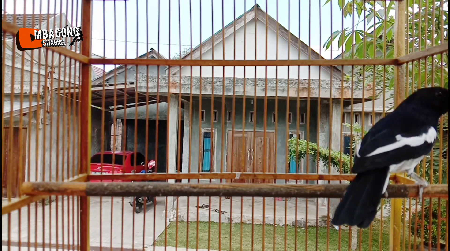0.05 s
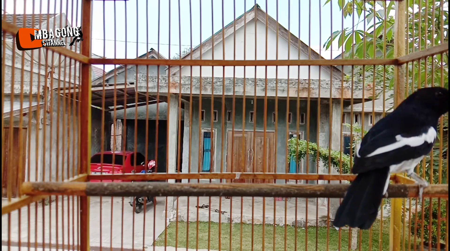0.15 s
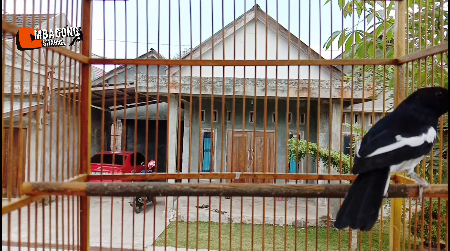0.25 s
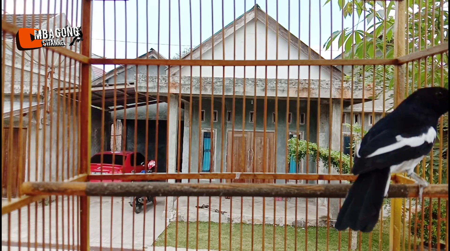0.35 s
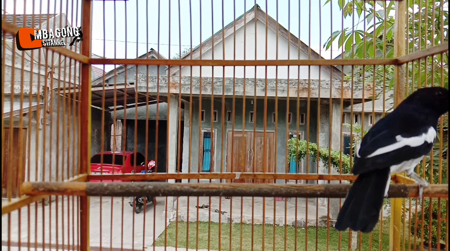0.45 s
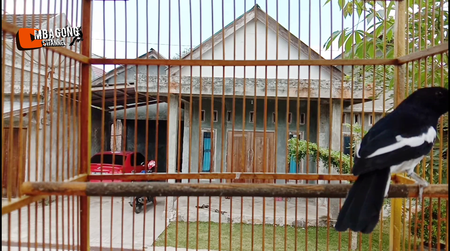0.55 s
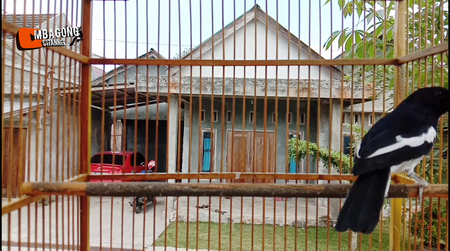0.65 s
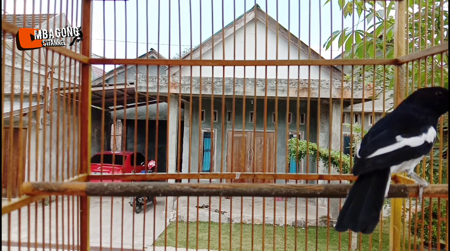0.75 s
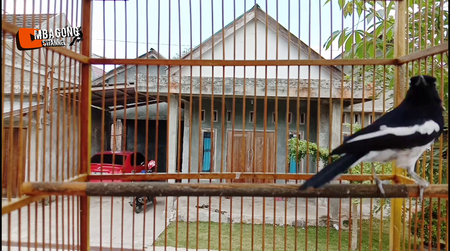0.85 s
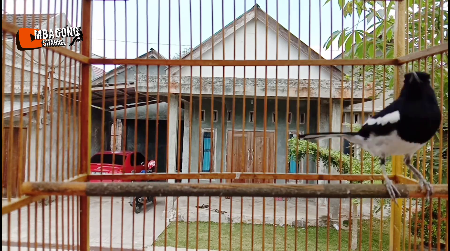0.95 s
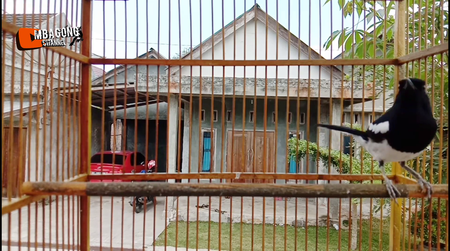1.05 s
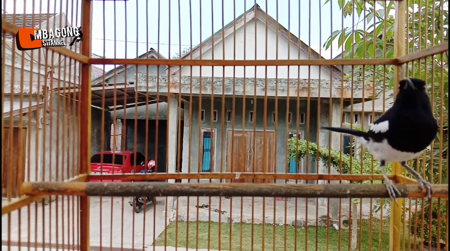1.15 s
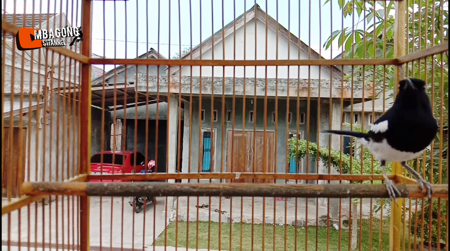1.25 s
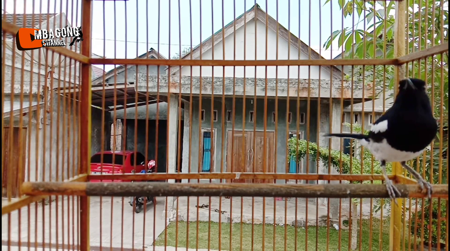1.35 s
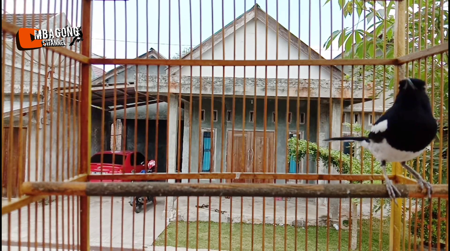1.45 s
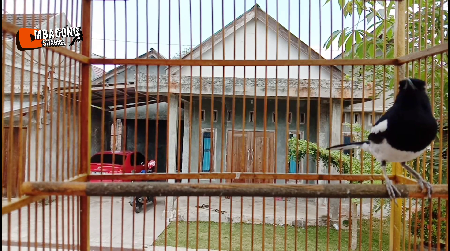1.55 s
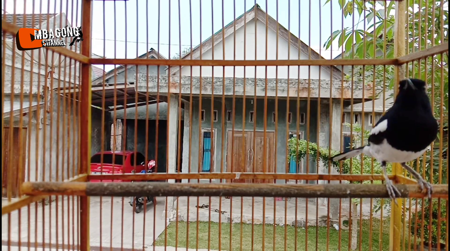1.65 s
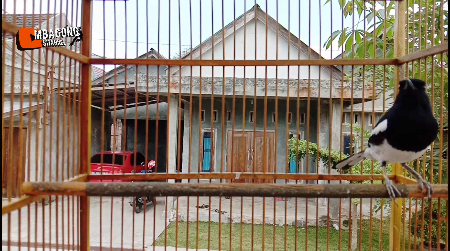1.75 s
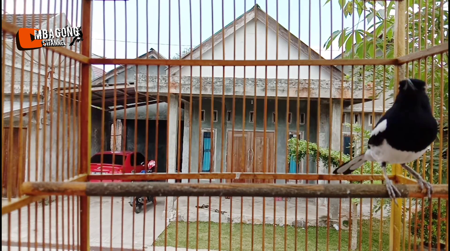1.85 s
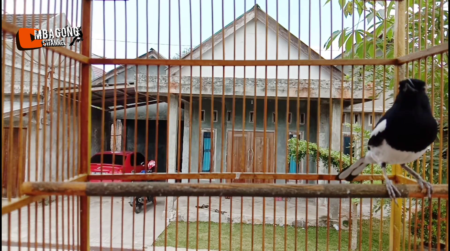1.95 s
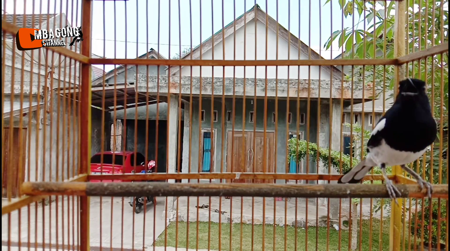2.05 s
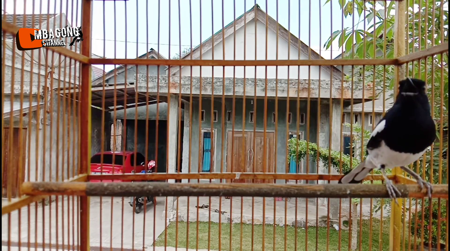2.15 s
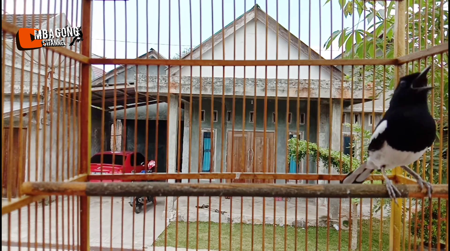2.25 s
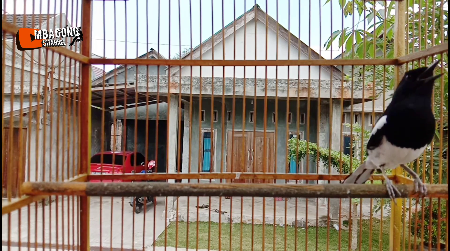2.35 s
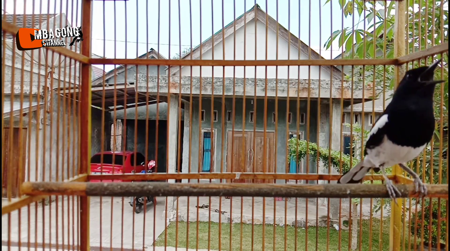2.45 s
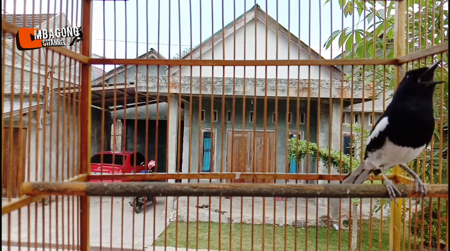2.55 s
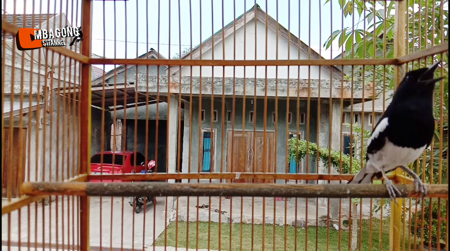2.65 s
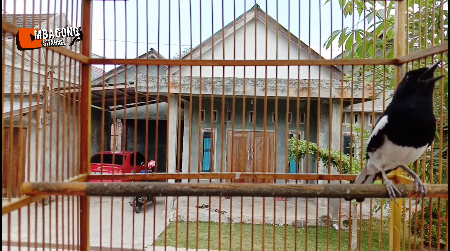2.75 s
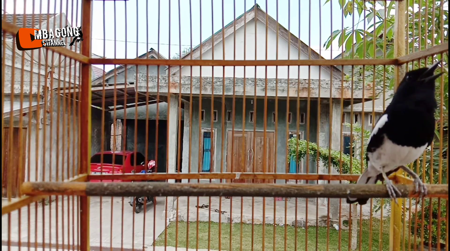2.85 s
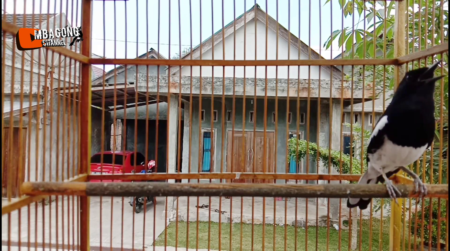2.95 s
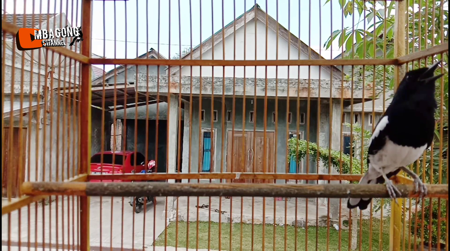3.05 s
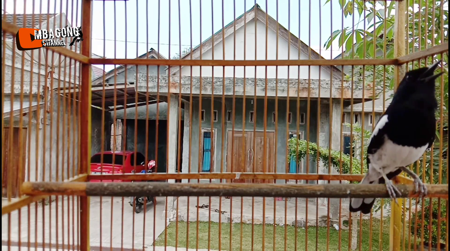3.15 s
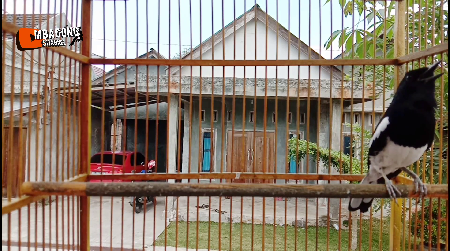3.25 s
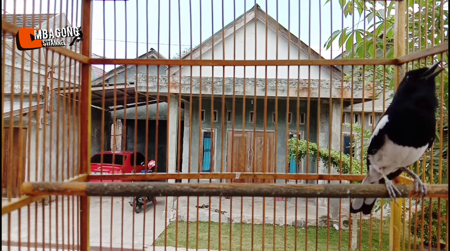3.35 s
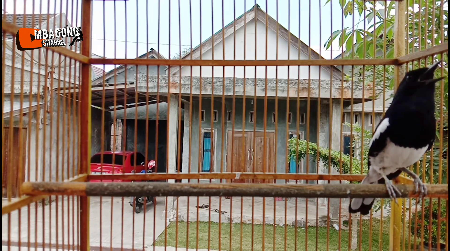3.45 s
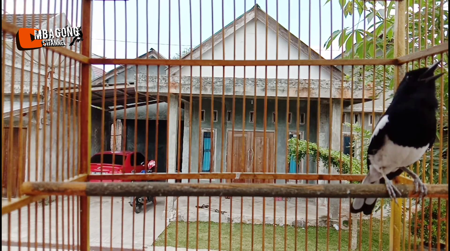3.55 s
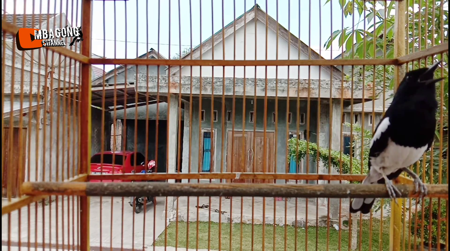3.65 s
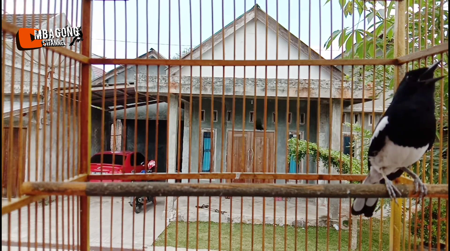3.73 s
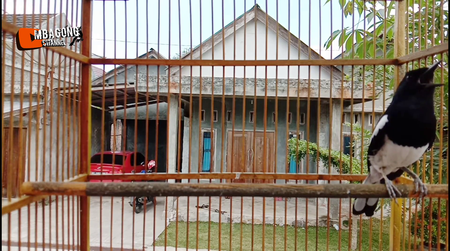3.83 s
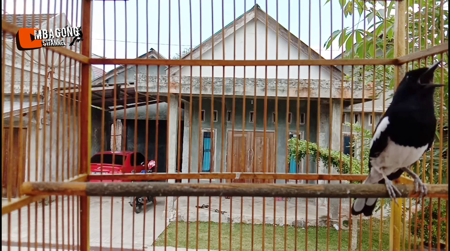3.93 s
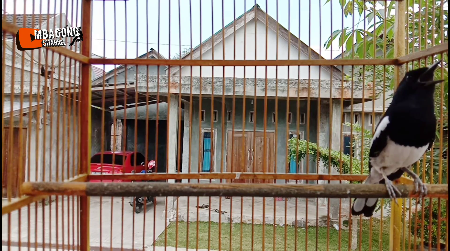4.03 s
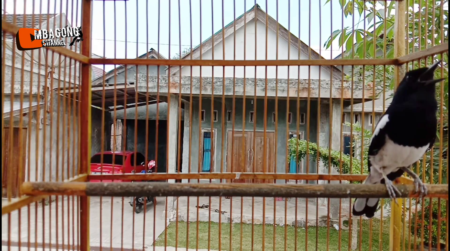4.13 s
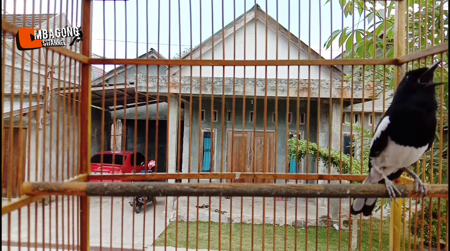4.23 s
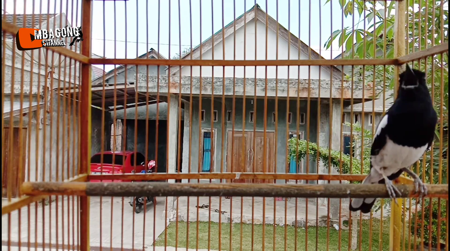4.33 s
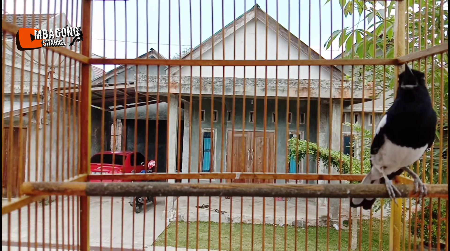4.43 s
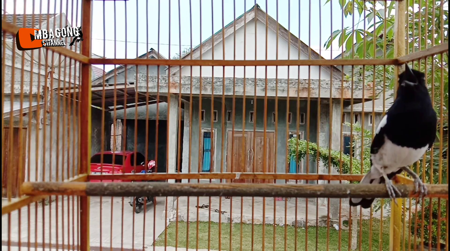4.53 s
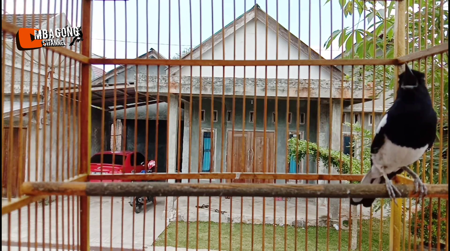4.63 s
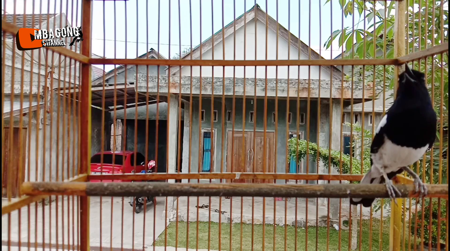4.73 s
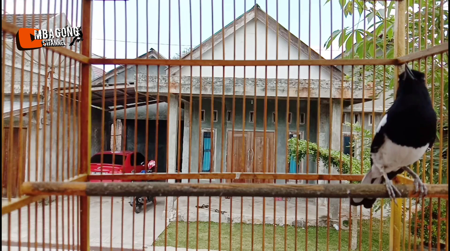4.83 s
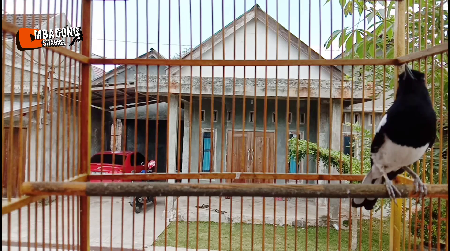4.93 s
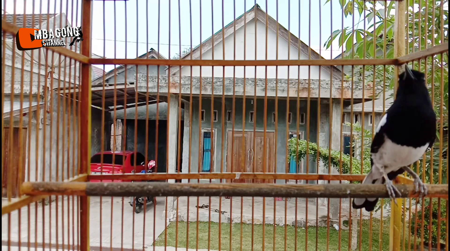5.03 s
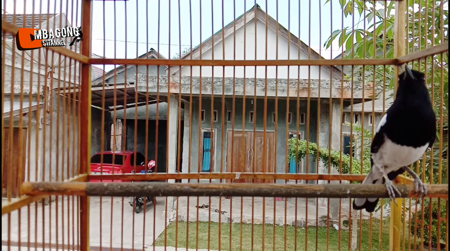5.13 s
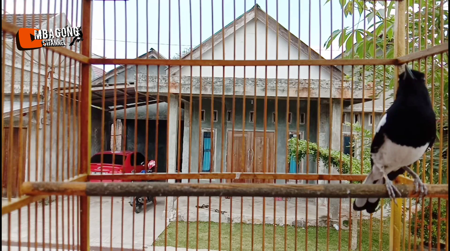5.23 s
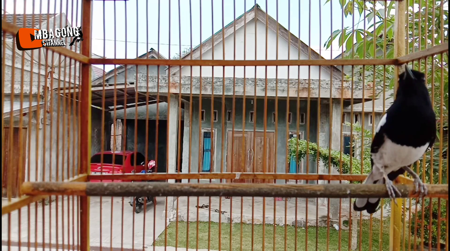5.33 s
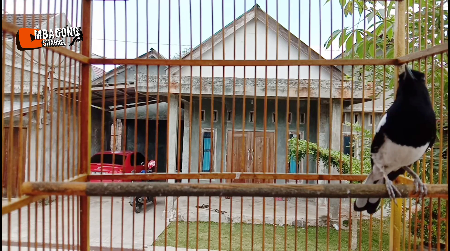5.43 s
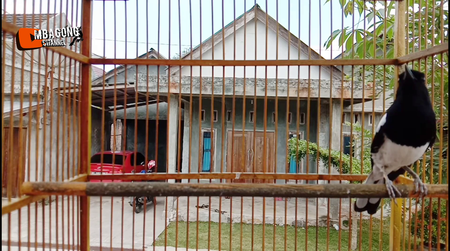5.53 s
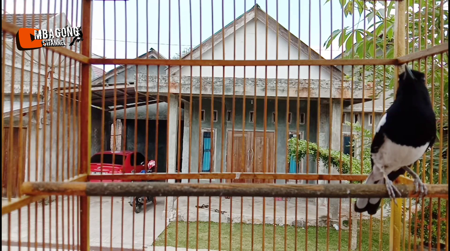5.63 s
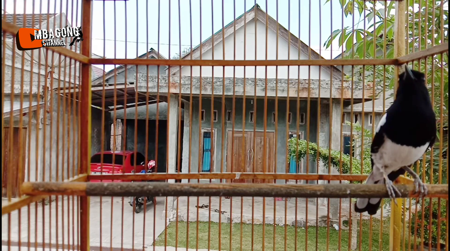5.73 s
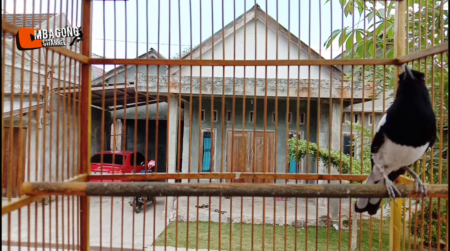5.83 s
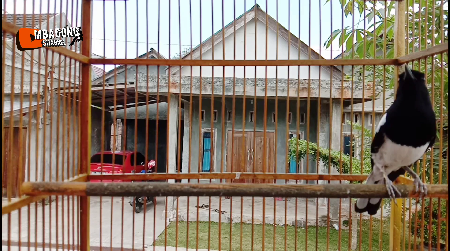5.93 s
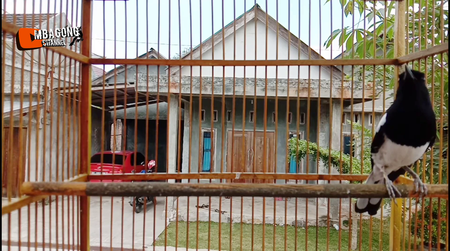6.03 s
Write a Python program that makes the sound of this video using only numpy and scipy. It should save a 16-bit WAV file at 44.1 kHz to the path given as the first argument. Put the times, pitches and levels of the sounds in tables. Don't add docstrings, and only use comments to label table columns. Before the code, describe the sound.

A caged songbird whistles a loud, clear phrase close up, over a quiet yard with distant rooster, buzzing sparrows, street hum and a rival's answering whistles.

```python
import sys
import numpy as np
from scipy import signal
from scipy.fft import rfft, irfft, next_fast_len
from scipy.io import wavfile
from scipy.ndimage import uniform_filter1d, minimum_filter1d, map_coordinates

SR = 44100
rng = np.random.default_rng(int(sys.argv[2]) if len(sys.argv) > 2 else 0)


def invert_db(x):
    u = np.asarray(x, float) / 20
    return 10 ** u


def file_out(sig):
    cols = np.atleast_2d(sig).T
    lim = np.clip(cols, -1, 1)
    pcm = np.round(lim * 32767).astype(np.int16)
    wavfile.write(sys.argv[1], SR, pcm)


N = 268128
DUCK_DB = 16


def unit(x):
    return x / np.sqrt(np.mean(x ** 2) + 1e-20)


def along(points, hz):
    f, v = np.transpose(points)
    return np.interp(np.log(hz + 1), np.log(f + 1), v)


def curves(rows):
    s, *columns = np.transpose(rows)
    first = round(s[0] * SR)
    t = np.arange(first, min(N, round(s[-1] * SR))) / SR
    return first, t, [np.interp(t, s, column) for column in columns]


def wobble(rate, size):
    knots = rng.standard_normal(int(size * rate / SR) + 4)
    return map_coordinates(knots, [np.arange(size) * rate / SR])


def coloured(x, spectrum):
    m = next_fast_len(len(x) + 8192)
    gain = invert_db(along(spectrum, np.fft.rfftfreq(m, 1 / SR)))
    return irfft(rfft(x, m) * gain, m)[:len(x)]


# (frequency [Hz], time to fall 60 dB [s])
WALL_RING = [(500, 0.06), (3000, 0.46), (8000, 0.26), (14000, 0.027)]


def walls(x, delay, size, stir=.45):
    hz, t, z = signal.stft(rng.standard_normal(SR), SR, nperseg=256)
    fade = invert_db(-60 * t / (size * along(WALL_RING, hz)[:, None]))
    tail = signal.istft(z * fade, SR, nperseg=256)[1]
    stirred = x * (1 - stir + stir * wobble(90, N))
    late = np.pad(stirred, (round(delay * SR), 0))
    return signal.fftconvolve(late, tail / np.linalg.norm(tail))[:N]


# (frequency [Hz], level [dB per Hz])
HIGH_HISS = [(5000, -41), (8500, -5.5), (11000, -8), (13500, -4.5), (15000, -3), (16100, -14)]


def steady_hiss():
    return invert_db(-79.5) * unit(coloured(rng.standard_normal(N), HIGH_HISS))


def patchy(depth_db):
    z = signal.stft(rng.standard_normal(N), nperseg=512)[2]
    field = uniform_filter1d(rng.standard_normal(z.shape), size=7, axis=0)
    field = uniform_filter1d(field, size=16, axis=1)
    return signal.istft(z * invert_db(depth_db * unit(field)), nperseg=512)[1][:N]


# (time [s], level [dB])
LORRY_LEVEL = [(0, -60.5), (.9, -56.5), (2.048, -57.5), (3.5, -49.5), (4.7, -50.5), (5.3, -49), (5.7, -56),
               (6.08, -49)]
# (frequency [Hz], level [dB per Hz])
LORRY_COLOUR = [(15, -45.5), (25, -40.5), (81, 0.5), (172, -10.5), (267, -18), (305, -16), (600, -23.5),
                (780, -52.5), (1320, -120)]
# (time [s], level [dB])
STREET_LEVEL = [(0, -53), (.9, -49.5), (1.5, -62), (2.051, -60.5), (3.499, -65), (4.7, -53), (5.15, -50),
                (5.401, -54), (6.08, -50.5)]
# (frequency [Hz], level [dB per Hz])
STREET_COLOUR = [(210, -46), (350, -27.5), (538, -16), (761, -0.5), (1250, -5.5), (1860, -19),
                 (2200, -17.5), (2860, -34.5), (4840, -120)]
# (time [s], level [dB])
FLOCK_LEVEL = [(0, -48.5), (1.5, -53.5), (2.049, -54), (2.45, -60), (2.8, -43.5), (3.3, -47.5), (3.75, -51),
               (4.701, -64), (5.15, -54.5), (5.45, -68.5), (5.75, -47), (5.86, -38.5), (6.08, -47)]
# (frequency [Hz], level [dB per Hz])
FLOCK_COLOUR = [(1530, -42), (2600, -15), (3420, -7.5), (5050, -10), (5970, -9), (6650, -14.5), (7570, -13),
                (9890, -41), (12000, -66.5)]
# (frequency [Hz], level [dB])
NARROW_DIP = [(6250, -1), (6550, -12.5), (6850, 1)]


def yard():
    t = np.arange(N) / SR
    out = np.zeros(N)
    for rows, colour, patch_db in ((LORRY_LEVEL, LORRY_COLOUR, 2),
                                   (STREET_LEVEL, STREET_COLOUR, 3.5),
                                   (FLOCK_LEVEL, FLOCK_COLOUR, 4)):
        level = invert_db(np.interp(t, *np.transpose(rows)))
        out += level * unit(coloured(patchy(patch_db), colour))
    return coloured(out, NARROW_DIP)


# (time [s], pitch [Hz], level [dB])
CROW_FADING = [(0, 570.6, -33.5), (.2, 601.9, -36.5), (.4, 558, -37), (.6, 583.5, -34), (.9, 579, -36.5),
               (1.1, 554.8, -45), (1.3, 542, -55.5), (1.5, 573, -93)]
# (time [s], pitch [Hz], level [dB])
CROW_LOW = [(0, 475.3, -33.5), (.14, 469.2, -36.5), (.2, 420, -43.5), (.4, 413, -33.5), (.6, 415.7, -46),
            (1.1, 439, -48), (1.3, 420.3, -59.5), (1.65, 400, -59.5), (1.8, 390, -52.5)]
# (frequency [Hz], level [dB])
CROW_THROAT = [(400, -60), (650, -20), (900, 8.5), (1200, 11), (1700, 10.5), (2300, 12.5), (2700, -12.5),
               (4000, -59)]


def rooster(rows, rough, jitter):
    _, t, (hz, db) = curves(rows)
    cycle = np.cumsum(hz * (1 + jitter * wobble(14, len(t)))) / SR
    pulses = np.exp(6 * (np.cos(2 * np.pi * cycle) - 1))
    breath = pulses * rng.standard_normal(len(t))
    voice = unit(coloured(pulses, CROW_THROAT)) + rough * unit(coloured(breath, CROW_THROAT))
    dry = invert_db(db + wobble(10.0, len(t))) * unit(voice)
    dry = np.pad(dry, (0, N - len(t)))
    return invert_db(-7.0) * dry + invert_db(-4.5) * walls(dry, delay=0.015, size=.8)


# (time [s], level [dB])
SPARROW_FALLS = [
    (0.046, -43.5),
    (.588, -45),
    (1.095, -44.5),
    (1.7, -47),
]
# (length [s], from [Hz], to [Hz], buzz [Hz])
SPARROW_FALL = (.1, 4900, 3200, 460)
# (time [s], length [s], level [dB])
SPARROW_RASPS = [(0.23, 0.18, -49), (1.195, 0.29, -44.5), (1.886, 0.18, -51), (2.7, 0.36, -42),
                 (3.31, 0.06, -48), (3.478, .1, -45.5), (3.779, 0.075, -54.5), (4.22, 0.12, -42.5),
                 (4.566, 0.066, -52), (4.756, 0.068, -54), (4.966, 0.23, -46), (5.62, 0.18, -52.5),
                 (5.707, 0.12, -45)]
# (from [Hz], fall [Hz per s], buzz [Hz])
SPARROW_RASP = (5290, 3500, 920)
# (time [s], length [s], from [Hz], to [Hz], level [dB])
FAR_CHIRPS = [(.12, 0.043, 5430, 8400, -46), (.33, 0.56, 8030, 7730, -46.5),
              (.512, 0.048, 4700, 3800, -44.5), (.507, 0.11, 6080, 5600, -53.5),
              (.797, 0.04, 5000, 3930, -47), (.836, 0.04, 5700, 6900, -46), (1.545, 0.064, 5980, 5850, -51),
              (1.583, 0.032, 5060, 5000, -50), (1.669, 0.08, 2488, 2910, -43.5),
              (5.486, 0.038, 4370, 4070, -52), (5.85, 0.063, 3700, 3526, -42),
              (5.93, 0.17, 4750, 4300, -43)]
# (time [s], length [s], from [Hz], to [Hz], level [dB])
FAINT_TONES = [
    (1.32, 0.43, 859, 798, -49),
    (3.57, .05, 320, 300, -48.5),
    (3.83, .05, 510, 502, -48.5),
    (4.82, 0.42, 3683, 3670, -58.5),
    (5.41, 0.22, 5080, 5100, -71.5),
    (1.4, 0.5, 1008, 1000, -60),
    (5.95, 0.12, 2353, 2206, -52),
]
# (time [s], length [s], from [Hz], to [Hz], level [dB])
FAR_TRILLS = [
    (5.14, .25, 2560, 2430, -40),
    (5.58, .2, 2730, 2660, -39),
    (4.76, .27, 3130, 3100, -44),
    (4.105, .085, 2930, 2850, -47),
]


def far_calls():
    for s, db in SPARROW_FALLS:
        yield (s, *SPARROW_FALL, db)
    from_hz, fall, buzz_hz = SPARROW_RASP
    for s, length, db in SPARROW_RASPS:
        yield s, length, from_hz, from_hz - fall * length, buzz_hz, db
    for calls, share in ((FAR_CHIRPS, .05), (FAINT_TONES, .01), (FAR_TRILLS, .033)):
        for s, length, from_hz, to_hz, db in calls:
            yield s, length, from_hz, to_hz, share * from_hz, db


# (frequency [Hz], level [dB])
FAR_COLOUR = [(2000, -2.5), (6250, 13), (6600, -19), (7100, -16.5), (8500, -7), (10000, -39)]


def far_birds():
    out = np.zeros(N + SR)
    for s, length, from_hz, to_hz, buzz_hz, db in far_calls():
        u = np.linspace(0, 1, round(length * SR))
        hz = from_hz + (to_hz - from_hz) * u + 0.19 * buzz_hz * wobble(90, len(u))
        swell = np.minimum(u * length / .022, 1) * (1 - u) ** .4
        share = np.clip(buzz_hz / 150, 0, 1)
        strands = .5 + np.cos(2 * np.pi * .7 * buzz_hz * length * u)
        chop = 1 - share + share * (.55 + .75 * wobble(1.1 * buzz_hz, len(u))) * strands
        tone = np.sin(2 * np.pi * np.cumsum(hz) / SR)
        out[round(s * SR):][:len(u)] += invert_db(db) * swell * chop * tone
    echo = walls(out[:N], delay=0.0095, size=.55)
    return coloured(invert_db(-3) * out[:N] + invert_db(2) * echo, FAR_COLOUR)


# (time [s], pitch [Hz], level [dB])
RIVAL_WHISTLES = [
    [(4.94, 2260, -53), (4.97, 2306, -46), (5.05, 2317, -40.5), (5.1, 2510, -37), (5.17, 2675, -38.5),
     (5.23, 2890, -52), (5.26, 2850, -69)],
    [(5.31, 2470, -59.5), (5.37, 2512, -38.5), (5.45, 2524, -31), (5.468, 2598, -32.5), (5.5, 3000, -37.5),
     (5.53, 3274, -32), (5.63, 3190, -41.5), (5.68, 2960, -55)],
]


def rival():
    out = np.zeros(N)
    for rows in RIVAL_WHISTLES:
        i, t, (hz, db) = curves(rows)
        shake_hz = 14 + 0.121 * np.maximum(hz - 2500, 0)
        hz = hz + shake_hz * wobble(100.05, len(t))
        tone = np.sin(2 * np.pi * np.cumsum(hz) / SR)
        out[i:i + len(t)] = invert_db(db + 1.0 * wobble(49.6, len(t))) * tone
    near_echo = invert_db(-1.0) * walls(out, delay=.003, size=.3)
    far_echo = invert_db(2.5) * walls(out, delay=.012, size=1.1, stir=0.63)
    return invert_db(-7) * out + near_echo + far_echo


# (time [s], level [dB], time to fall 60 dB [s])
HOP_NOISES = [
    (0.957, -58, 0.013),
    (.976, -54, 0.013),
    (1.017, -62, 0.0054),
    (0.929, -71.5, 0.47),
    (5.486, -69, 0.013),
    (5.827, -51, 0.019),
    (5.83, -64, 0.54),
]
# (frequency [Hz], level [dB])
HOP_COLOUR = [(60, -25), (250, -21), (600, 23), (2000, 22.5), (4000, 27), (7500, 29.5), (10000, 9),
              (13000, 15), (15300, 18)]


def hops():
    out = np.zeros(N + SR)
    t = np.arange(SR // 2) / SR
    for s, db, t60 in HOP_NOISES:
        fade = invert_db(db - 60 * t / t60 + 2.3 * wobble(114, len(t)))
        out[round(s * SR):][:len(t)] += fade * rng.standard_normal(len(t))
    return coloured(out[:N], HOP_COLOUR)


# (level [dB], pitch [Hz], time to fall 60 dB [s])
PERCH_KNOCK = (-44, 120, 0.15)


def thump():
    db, hz, t60 = PERCH_KNOCK
    t = np.maximum(np.arange(N) / SR - 5.826, 0)
    fade = invert_db(db - 60 * t / t60) * np.minimum(t / 0.002, 1)
    rattle = 3.2 * wobble(390, N) * np.cos(2 * np.pi * 280 * t)
    return fade * (np.sin(2 * np.pi * hz * t) + rattle)


# (time from edge [s], pitch ratio, tone change [dB], overtone change [dB])
NOTE_START = (-.0025, 1.154, -16, -29)
END_CUT = [(.005, 1, -10.5, -0.5), (.010, 0.93, -36.5, -36.5)]
END_SLIDE = [(.004, 0.94, -6.5, 0.5), (.009, 0.924, -10, 0.5), (0.02, 0.68, -54.5, -23)]
END_HICCUP = [(.004, 0.99, -2, 1.5), (.0075, .93, -15.5, -17), (.010, 0.893, -7.5, -0.5),
              (0.017, .8, -15, 5.5), (0.025, 0.58, -54.5, -0.5)]
END_CATCH = [(.004, 1, -11, -4), (.0075, .93, -1, 4), (.011, .85, -8, -3), (.016, .74, -32, -20)]
# (time [s], pitch [Hz], tone level [dB], 2nd
# overtone [dB], 3rd overtone [dB])
NOTES_CUT_MORE = [
    [(2.082, 3440, -9.5, -25, -59.5), (2.091, 3470, -7, -35.5, -63), (2.113, 3476, -3.5, -41, -64),
     (2.129, 3392, -4.5, -30.5, -54.5), (2.141, 3370, -10.5, -31, -45.5), (2.157, 3250, -7, -22.5, -37.5),
     (2.17, 3006, -4, -24, -37), (2.195, 2890, -5, -28, -37)],
    [(2.468, 3634, -13, -19, -37), (2.476, 3560, -6, -18, -36), (2.491, 3627, -3.5, -23, -31),
     (2.515, 3620, -5.5, -25.5, -35), (2.53, 3620, -3, -30.5, -37), (2.548, 2937, -13, -32, -42)],
    [(2.513, 4084, -17, -47, -57), (2.523, 4036, -22, -25, -42), (2.54, 3663, -3, -19, -38),
     (2.553, 3210, -13.5, -26.5, -33), (2.561, 2740, -15, -31, -39), (2.566, 2976, -15, -31.5, -43)],
    [(2.668, 3703, -7.5, -25.5, -33), (2.671, 3773, -2, -27.5, -35)],
    [(2.68, 3955, -12, -28.5, -41), (2.684, 4000, -7, -22.5, -46), (2.69, 3927, -23, -34, -46)],
    [(3.393, 2245, -19.5, -28, -46), (3.4, 2340, -13.5, -22.5, -28), (3.41, 2484, -8.5, -25, -34),
     (3.427, 2428, -6.5, -18.5, -28), (3.432, 2520, -8.5, -30, -30)],
]
NOTES_BLIP = [
    [(4.086, 4670, -30, -65, -80), (4.104, 4680, -37, -70, -80)],
    [(4.12, 4500, -48, -75, -85), (4.129, 4670, -31, -66, -80), (4.143, 4680, -39, -70, -80)],
    [(4.163, 4500, -52, -78, -85), (4.171, 4680, -42, -75, -85)],
]
NOTES_CUT = [
    [(2.197, 3840, -15, -38.5, -58), (2.205, 3670, -7.5, -26.5, -39), (2.215, 3960, -11, -25.5, -47),
     (2.239, 4000, -11.5, -26.5, -35), (2.251, 3975, -7.5, -23, -33.5), (2.295, 3850, -5.5, -17.5, -32.5),
     (2.327, 3829, -5.5, -19, -37), (2.353, 3642, -3.5, -30, -34), (2.36, 3473, -4.5, -37.5, -41)],
    [(2.571, 3476, -7, -36, -33), (2.587, 3576, -5.5, -28, -36), (2.601, 3554, -3.5, -21.5, -32.5),
     (2.649, 3654, -3.5, -27.5, -33.5), (2.661, 3656, -6, -21, -33)],
]
NOTES_ARCHED = [
    [(3.438, 2720, -9.5, -54.5, -51), (3.444, 2920, -3, -33, -33), (3.452, 3100, -3.5, -36, -53.5),
     (3.46, 3067, -2.5, -32.5, -36.5), (3.484, 3107, -4.5, -38, -37), (3.492, 3040, -1.5, -51.5, -34),
     (3.5, 2990, -5.5, -28, -42), (3.504, 2850, -12.5, -34, -45.5)],
    [(3.612, 3136, -15.5, -32, -57), (3.626, 3256, -5.5, -28.5, -38), (3.668, 3382, -4, -28, -38.5),
     (3.702, 3346, -2.5, -26, -41.5), (3.722, 3266, -3.5, -31.5, -36.5), (3.736, 3128, -1, -28.5, -40.5),
     (3.738, 3120, -5.5, -48, -43), (3.744, 2840, -4, -20, -27.5), (3.75, 2764, -12.5, -28, -40)],
]
NOTES_SLID = [
    [(2.846, 2420, -26.5, -23.5, -40), (2.86, 2530, -13, -21, -26.5), (2.876, 2527, -11, -28.5, -36.5),
     (2.886, 2685, -5, -61, -36), (2.892, 2684, -6, -42, -36), (2.904, 2665, -5.5, -34.5, -49.5),
     (2.93, 2656, -6, -33.5, -54), (2.942, 2723, -3.5, -32, -38), (2.954, 2696, -7.5, -26, -42)],
    [(3.032, 2450, -20.5, -30.5, -33), (3.043, 2540, -12, -21, -26), (3.06, 2620, -7.5, -23, -34),
     (3.075, 2605, -8.5, -25.5, -33.5), (3.085, 2640, -5.5, -28.5, -37), (3.115, 2670, -6, -35.5, -49),
     (3.129, 2650, -6.5, -31, -32), (3.137, 2605, -11.5, -24, -33)],
    [(3.224, 2410, -15.5, -25, -22.5), (3.232, 2443, -9, -20, -32), (3.246, 2511, -7, -26, -32),
     (3.304, 2501, -6, -22.5, -33), (3.325, 2466, -11.5, -20.5, -27.5)],
]
NOTES_CAUGHT = [
    [(3.869, 3816, -9.5, -22, -46), (3.876, 3905, -13.5, -15, -36.5), (3.906, 3948, -10, -17, -24.5),
     (3.92, 4045, -5.5, -24, -39), (3.944, 4360, -3.5, -31.5, -35.5), (4.008, 4635, -6, -37.5, -44),
     (4.019, 4650, -7, -38, -37), (4.03, 4600, -4.5, -36, -36), (4.063, 4695, -3.5, -33.5, -32.5),
     (4.071, 4634, -9.5, -38, -43)],
]
NOTES_HICCUP = [
    [(4.199, 3253, -14.5, -43, -45), (4.207, 3219, -7.5, -32, -33), (4.223, 3426, -7.5, -35, -35),
     (4.243, 3487, -2, -28.5, -41.5), (4.307, 3600, -3.5, -32, -41.5), (4.379, 3545, -5.5, -28, -39.5),
     (4.421, 3655, -1.5, -29.5, -40), (4.43, 3604, -4.5, -33, -39.5)],
    [(4.495, 3420, -16, -44, -67), (4.5, 3437, -10, -34, -66), (4.514, 3515, -7, -31, -40),
     (4.536, 3633, -2.5, -28.5, -41), (4.545, 3543, -0.5, -26.5, -35)],
    [(4.657, 3560, -15, -31.5, -59), (4.667, 3574, -6, -22.5, -42), (4.685, 3648, -5.5, -29, -37.5),
     (4.695, 3687, -8, -27.5, -36), (4.709, 3640, -3, -27.5, -39), (4.719, 3592, -2, -28.5, -37)],
]


def phrase():
    def edge(row, step):
        s, hz, db, second_db, third_db = row
        later, ratio, tone_db, over_db = step
        return s + later, hz * ratio, db + tone_db, second_db + over_db, third_db + over_db

    cut_notes = NOTES_CUT_MORE + NOTES_BLIP + NOTES_CUT + NOTES_ARCHED
    for notes, ending in ((cut_notes, END_CUT), (NOTES_SLID, END_SLIDE),
                          (NOTES_CAUGHT, END_CATCH), (NOTES_HICCUP, END_HICCUP)):
        for held in notes:
            yield [edge(held[0], NOTE_START), *held, *(edge(held[-1], step) for step in ending)]


# (from [s], to [s], rate [Hz], pitch rise [Hz], level dip [dB])
THROAT_FLUTTER = (2.163, 2.198, 85, 420, -7)
# (frequency [Hz], level over the 3rd [dB])
TREBLE_LIFT = [(12500, -17), (14000, -14), (14800, 9.5), (15500, 1)]
# (frequency [Hz], level [dB])
BREATH_COLOUR = [(12500, -61.5), (13800, -14.5), (14800, -2.5), (15400, -2.5)]
# (time [s], level [dB], pitch [Hz], hiss level [dB])
VOICE_CATCHES = [(2.083, -38, 3930, -41), (2.164, -28, 5030, -17), (2.189, -22.5, 4840, -15),
                 (2.467, -35.5, 4150, -39), (2.525, -34, 5960, -11), (2.55, -24.5, 5620, -16),
                 (2.653, -39.5, 5920, -32), (3.033, -21, 3660, -51.5), (3.224, -19, 3700, -45),
                 (3.322, -15.5, 2940, -25.5), (3.417, -27.5, 3600, -30), (3.611, -23, 3480, -48),
                 (3.695, -29, 14630, -10), (3.752, -25, 3250, -24.5), (3.871, -20, 4110, -45),
                 (4.2, -26, 3490, -42.5), (4.199, -37, 6900, -34)]


def songbird():
    out = np.zeros(N)
    start, stop, rate, rise_hz, dip_db = THROAT_FLUTTER
    for note in phrase():
        i, t, (hz, db, second_db, third_db) = curves(note)
        size = len(t)
        fluttering = (t > start) * (t < stop) * (t[0] < start)
        flutter = np.sin(np.pi * rate * (t - start)) ** 4 * fluttering
        hz = uniform_filter1d(hz, size=90) + rise_hz * flutter + 9 * wobble(150, size)
        glide = uniform_filter1d(np.abs(np.gradient(hz)), size=300)
        hoarse = .24 * np.clip(glide - .4, 0, 1) * wobble(1300, size)
        hush_db = 4 * np.minimum(glide, 1)
        turn = 2 * np.pi * np.cumsum(hz) / SR + hoarse

        levels_db = [db, second_db, third_db, third_db - 13.5,
                     third_db + np.maximum(-22, along(TREBLE_LIFT, 5 * hz)),
                     third_db + along(TREBLE_LIFT, 6 * hz)]
        tone = np.zeros(size)
        for k, level_db in enumerate(levels_db, 1):
            phase = k * turn + k
            if k > 1:
                level_db = level_db + 1.5 * wobble(60, size)
                phase = phase + .14 * k / 3 * wobble(900, size)
            if k > 2:
                level_db = level_db - (k - 2) * hush_db
            top_fade = np.clip((17500 - k * hz) / 1000, 0, 1)
            tone += invert_db(level_db) * top_fade * np.sin(phase)

        whisper_db = db - 44 - 14 * np.clip((hz - 2700) / 500, 0, 1)
        whisper = invert_db(whisper_db) * unit(coloured(rng.standard_normal(size), BREATH_COLOUR))
        edges = signal.windows.tukey(size, 70 / size)
        swell = invert_db(dip_db * flutter + .5 * wobble(140, size))
        out[i:i + size] += np.sqrt(2) * swell * edges * (tone + whisper)

    t = np.arange(-300, 300) / SR
    for s, db, hz, hiss_db in VOICE_CATCHES:
        rasp = wobble(1800, len(t)) * np.sin(2 * np.pi * hz * t)
        breath = rasp + invert_db(hiss_db) * rng.standard_normal(len(t))
        out[round(s * SR) - 300:][:len(t)] += invert_db(db) * np.exp(-(t / 0.0024) ** 2) * breath
    return invert_db(DUCK_DB) * out


# (frequency [Hz], level [dB])
HOUSE_COLOUR = [(3000, 2), (5000, 5), (7500, 4.5)]


def scene():
    background = steady_hiss() + yard() + far_birds() + rival()
    crows = rooster(CROW_FADING, rough=.55, jitter=.011) + rooster(CROW_LOW, rough=.8, jitter=.028)
    bird = songbird()
    near_wall = invert_db(-27) * walls(bird, delay=0.0033, size=.2)
    house = invert_db(-29.5) * coloured(walls(bird, delay=0.022, size=.78, stir=0.59), HOUSE_COLOUR)
    return (background + crows + hops() + thump() + bird + near_wall + house)[None]


# (time [s], level [dB])
GAIN_JOLTS = [(2.092, 0.5), (2.152, 1.5), (2.252, 3.3), (2.292, 1.5), (2.312, -3.6), (2.332, 2),
              (2.342, 1.5), (2.352, 0), (2.492, -1.5), (2.512, 1.2), (2.612, -1), (2.632, -0.5),
              (2.642, -2.5), (2.652, -0.5), (2.872, -2.5), (2.892, 1.6), (2.912, -2.5), (2.932, -0.5),
              (3.052, -1), (3.072, -1), (3.092, -1), (3.112, -2.8), (3.232, 1), (3.252, -1.4), (3.272, 0.8),
              (3.632, -1), (3.652, -1.5), (3.672, 1.5), (3.692, 1.8), (3.722, -3), (3.932, -3.5),
              (4.212, -1.6), (4.232, -1.4), (4.262, -1.9), (4.272, -1.5), (4.412, -0.8), (4.512, -1),
              (4.672, 0), (4.692, 3.5), (4.712, 0.5)]


def gain_control(x, knee_db, release_db, kick_s):
    size = SR // 100
    lead = 353
    need_db = np.clip(knee_db - 20 * np.log10(np.abs(x) + 1e-9), -DUCK_DB, 0)
    gain_db = np.pad(need_db, (lead, -(N + lead) % size)).reshape(-1, size).min(1)
    for b in range(1, len(gain_db)):
        gain_db[b] = min(gain_db[b], gain_db[b - 1] + release_db)
    held_db = np.repeat(np.roll(gain_db, 1) + release_db, size)[lead:lead + N]
    duck_db = np.minimum(held_db, minimum_filter1d(need_db, size=200))
    ducked = x * invert_db(uniform_filter1d(duck_db, size=120))

    s, db = np.transpose(GAIN_JOLTS)
    block = np.round((s * SR + lead) / size).astype(int)
    depth_db = np.bincount(block, db, len(gain_db))
    kick_db = .46 * depth_db[:, None] * np.exp(-np.arange(size) / (kick_s * SR))
    kick_db = uniform_filter1d(kick_db.ravel()[lead:lead + N], size=9)
    return ducked * invert_db(uniform_filter1d(kick_db, size=12))


def low_pass(x):
    return signal.sosfilt(signal.butter(12, 16260, fs=SR, output="sos"), x)


def record(dry):
    x = gain_control(dry[0], knee_db=-15, release_db=2.0, kick_s=0.0037)
    need = np.minimum(1, 1.02 / (np.abs(x) + 1e-9))
    x = x * uniform_filter1d(minimum_filter1d(need, size=90), size=60)
    thuds = coloured(x * x, [(8, -39.5), (25, -7.5), (250, -6.0), (700, -15.0), (16000, -26.5)])
    x = x + invert_db(-32.0) * thuds - .043 * x ** 3
    x = coloured(x, [(15520, 0), (15750, -22), (16200, -36), (16300, -89)])
    return low_pass(x[None])


dry = scene()
out = record(dry)
file_out(out)
```